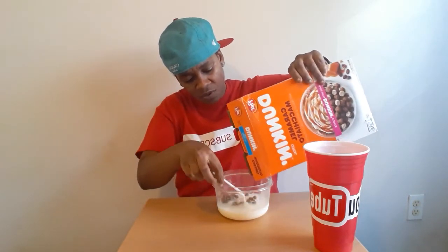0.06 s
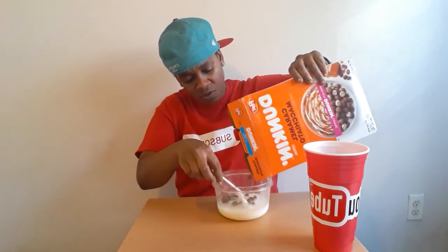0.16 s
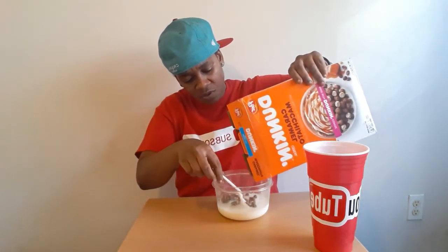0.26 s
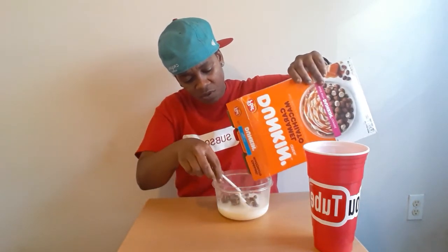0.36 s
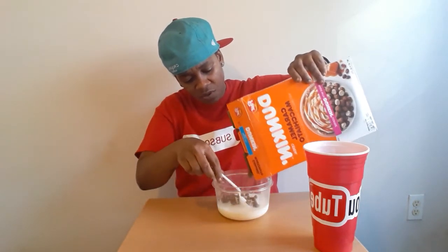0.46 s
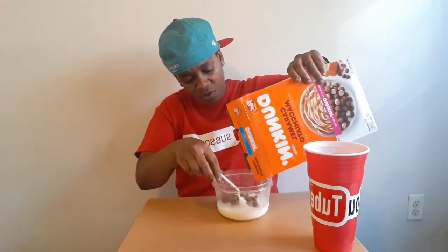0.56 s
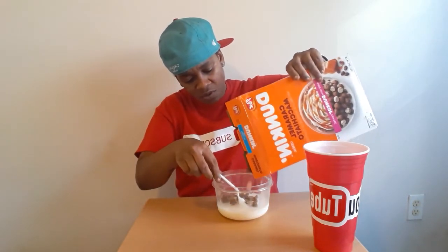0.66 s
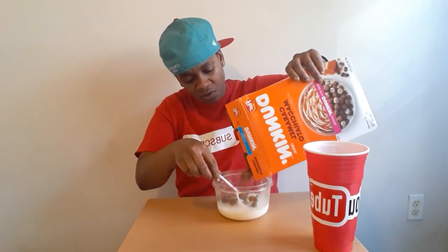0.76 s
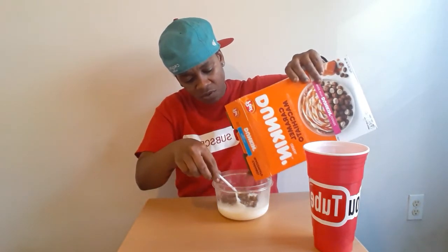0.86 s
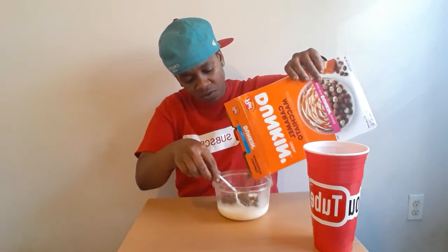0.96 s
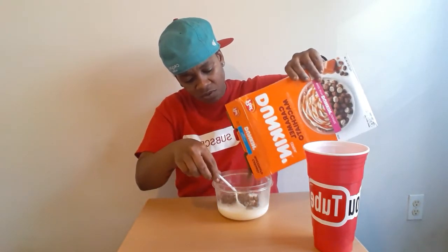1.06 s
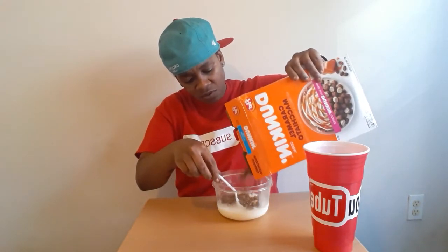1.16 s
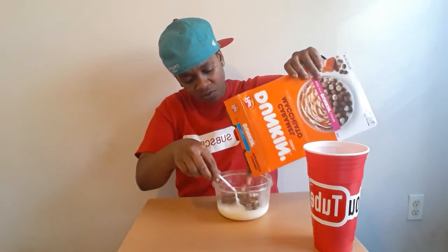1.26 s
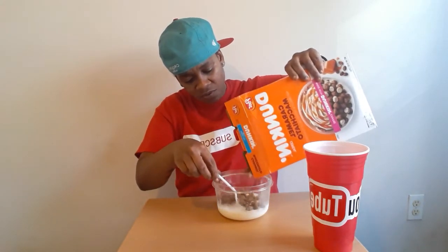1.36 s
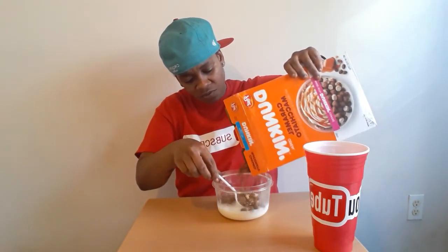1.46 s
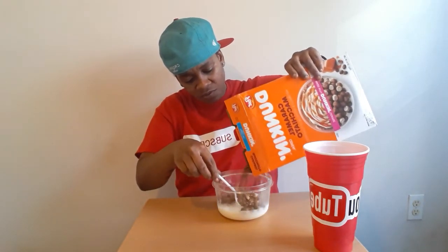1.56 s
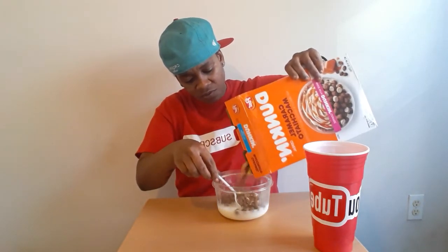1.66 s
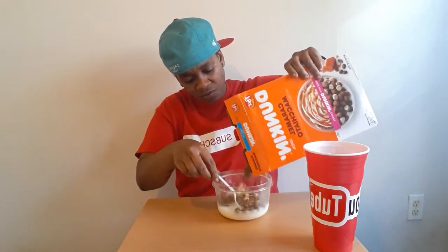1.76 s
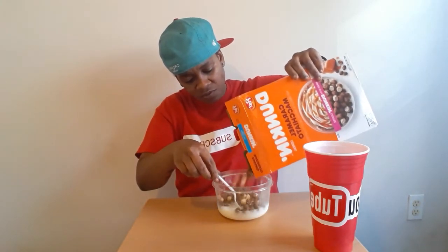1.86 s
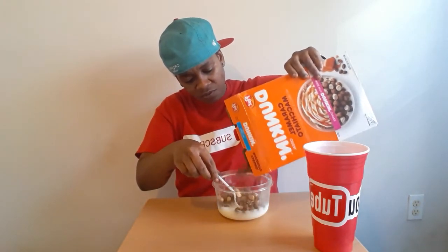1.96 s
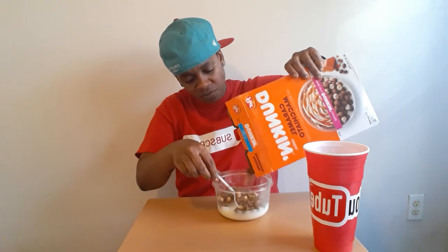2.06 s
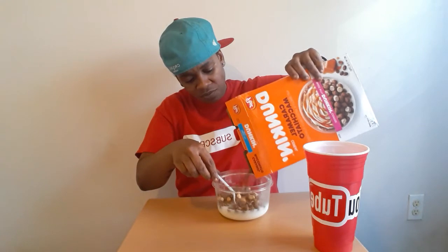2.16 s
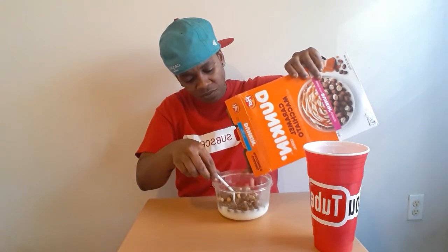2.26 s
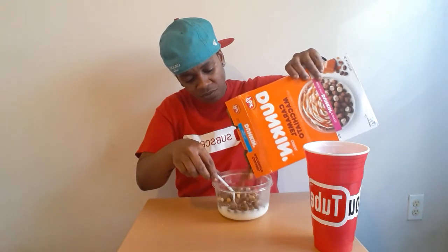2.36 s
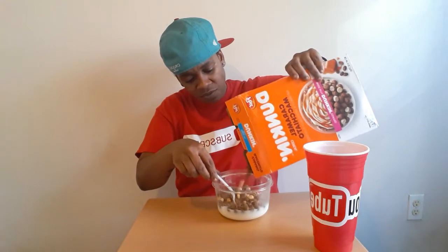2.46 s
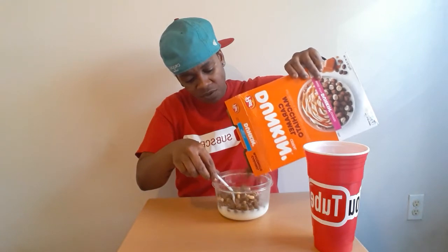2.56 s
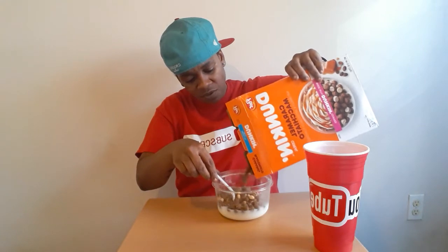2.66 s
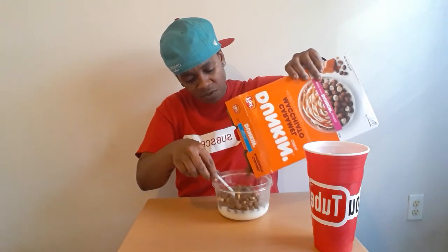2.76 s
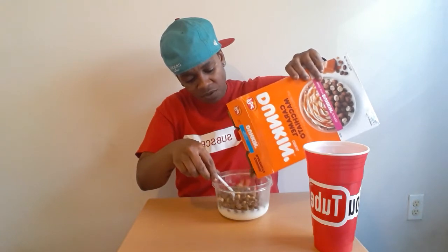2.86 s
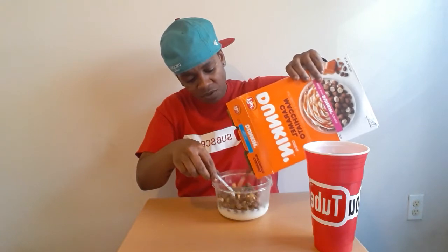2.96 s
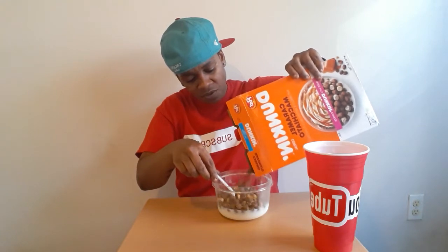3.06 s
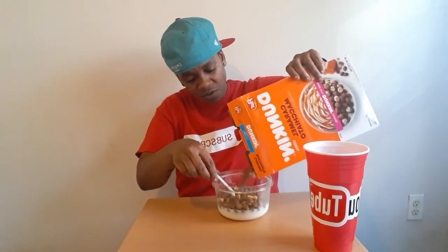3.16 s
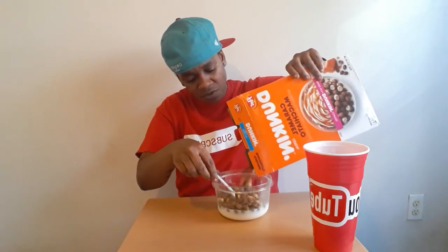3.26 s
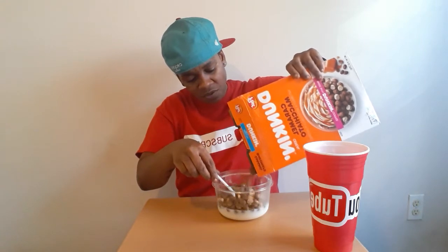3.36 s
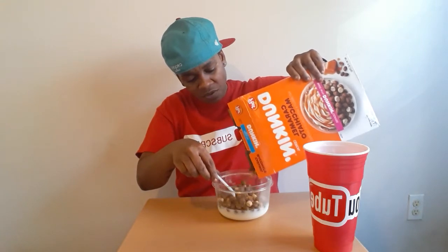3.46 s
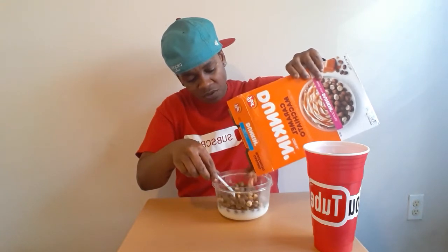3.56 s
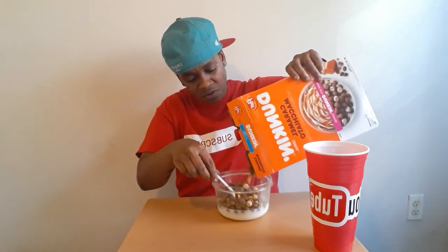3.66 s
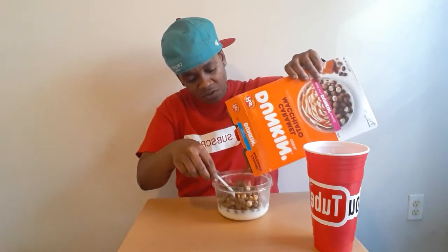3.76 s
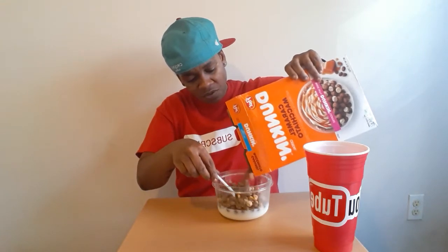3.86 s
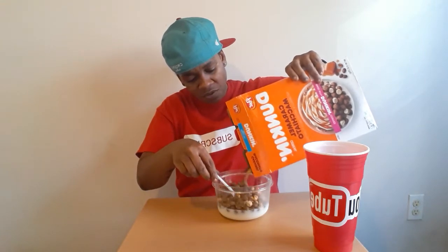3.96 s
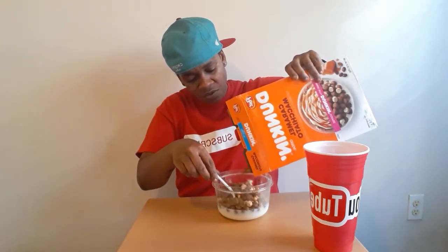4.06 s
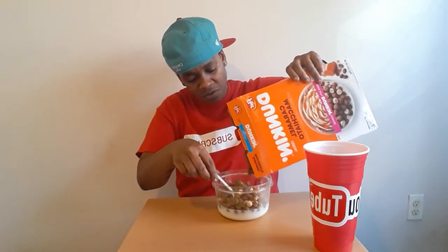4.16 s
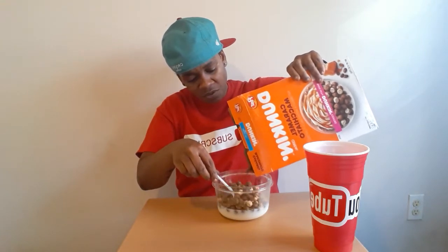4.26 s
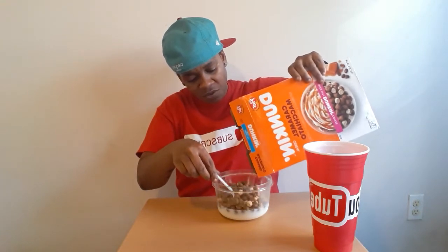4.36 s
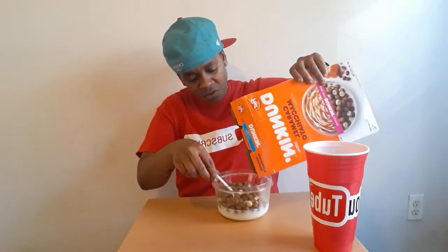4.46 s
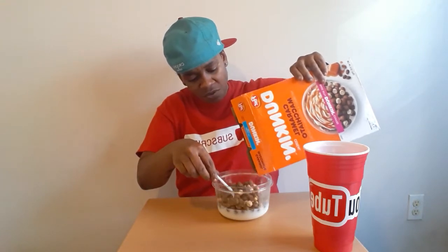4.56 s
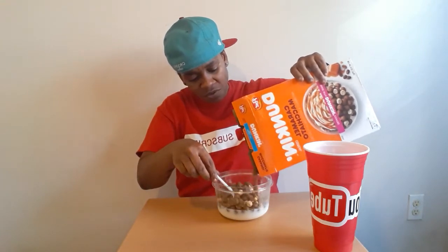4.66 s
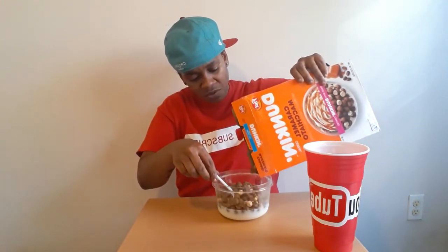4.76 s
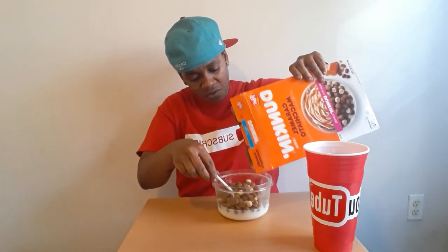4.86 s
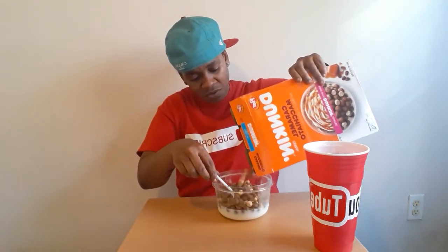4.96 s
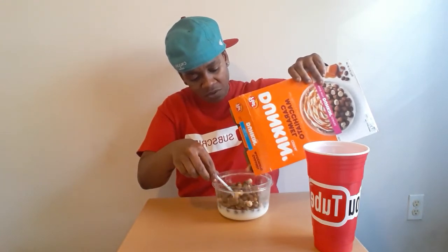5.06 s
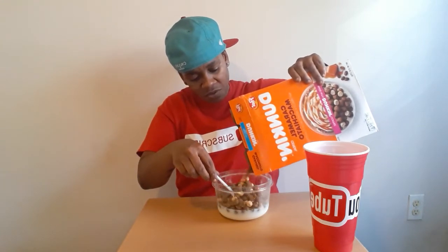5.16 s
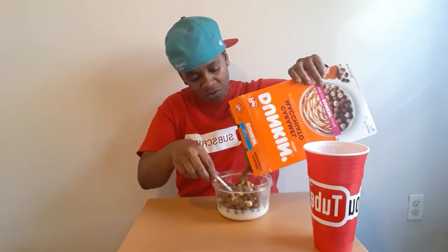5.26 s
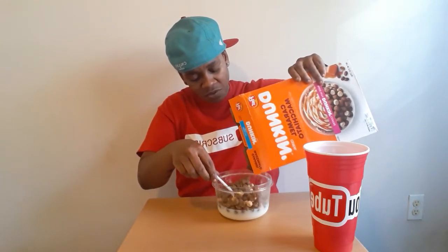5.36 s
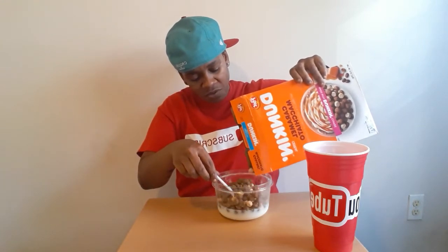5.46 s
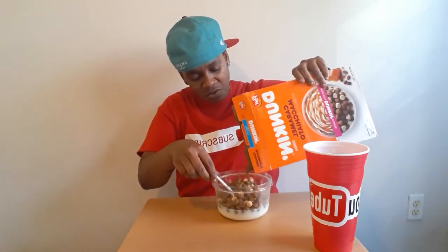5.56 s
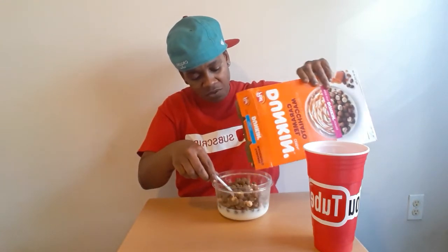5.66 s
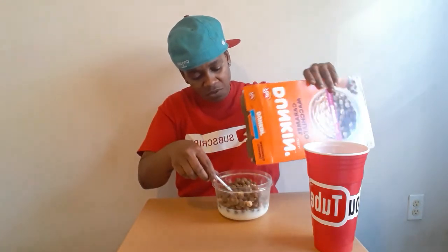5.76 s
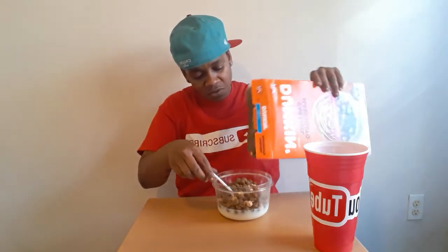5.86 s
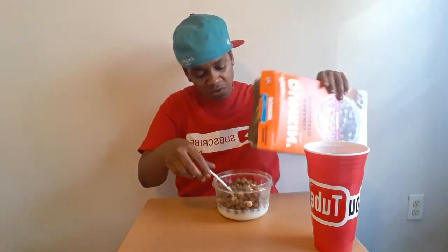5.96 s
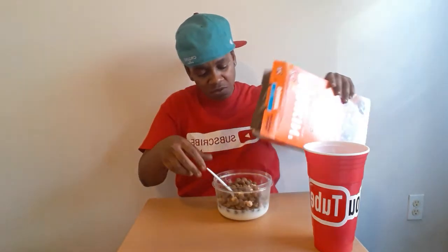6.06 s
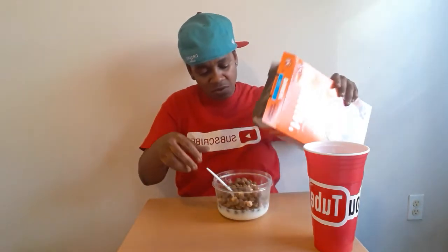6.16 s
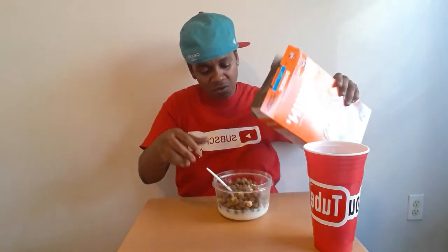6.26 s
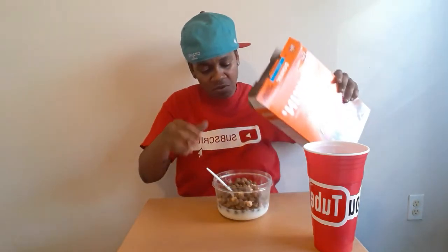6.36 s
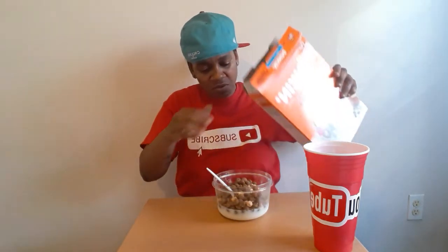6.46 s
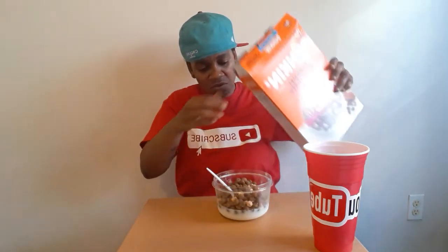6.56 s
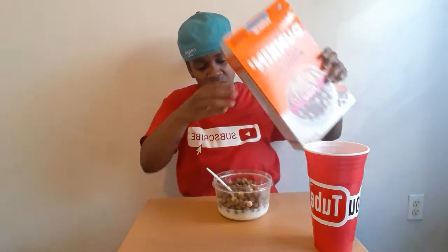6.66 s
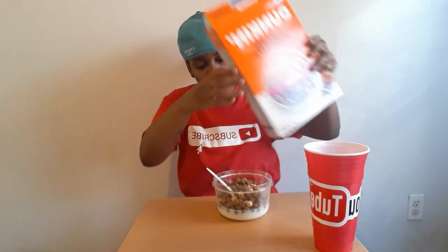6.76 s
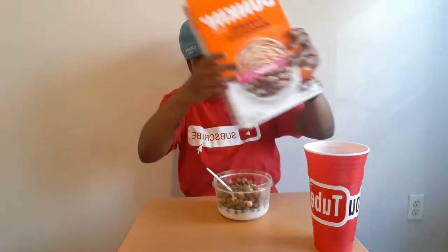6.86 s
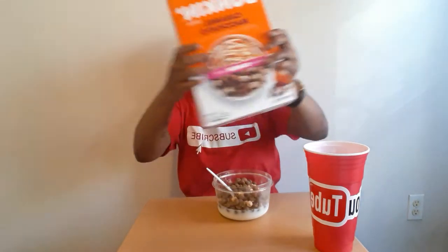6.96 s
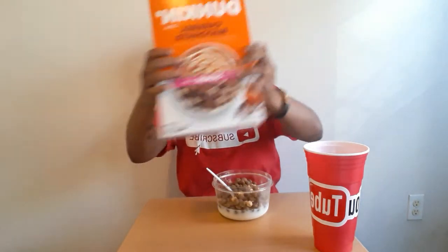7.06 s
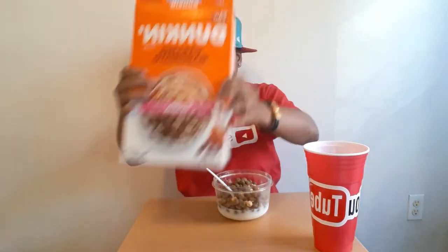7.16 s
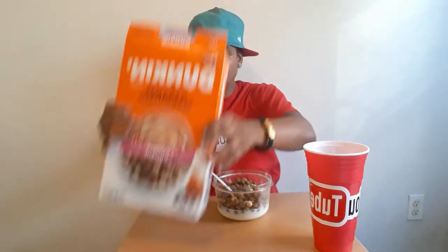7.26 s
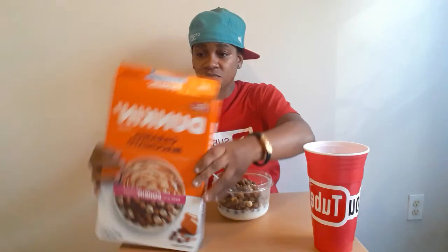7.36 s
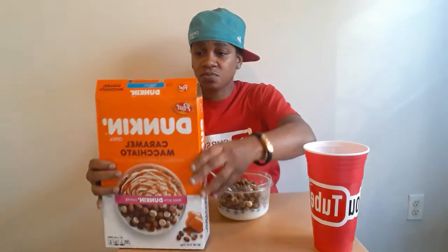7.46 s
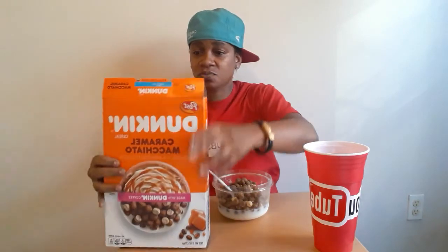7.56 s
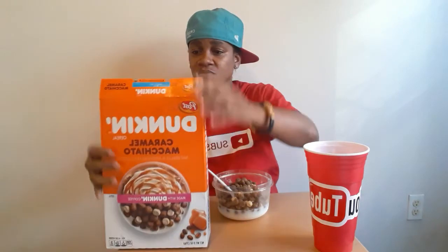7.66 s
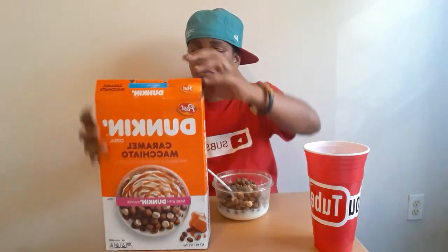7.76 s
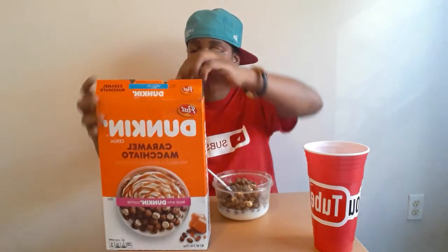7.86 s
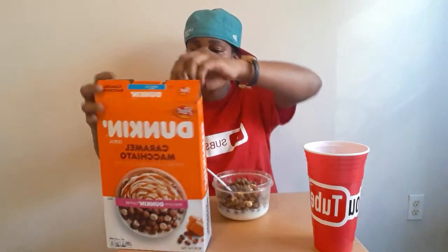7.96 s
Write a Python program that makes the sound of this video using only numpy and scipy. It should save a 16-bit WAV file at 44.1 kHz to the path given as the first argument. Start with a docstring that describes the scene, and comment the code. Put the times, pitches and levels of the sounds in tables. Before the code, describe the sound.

A close stereo microphone in a small bare room catches cereal shaken from a box: papery rustle, soft cardboard rumble, dry patter and crisp, high plastic ticks from the bowl, in irregular clusters. It thins out and nearly stops before six seconds. After a quiet moment of faint handling, the contents hiss and rattle to the bottom, the box thumps down, and a last small rustle ends it.

```python
"""Puffed cereal is shaken out of a cardboard box into a plastic bowl, in a bare room before a small stereo microphone.
Pieces rumble along the box wall, patter on each other and rustle in the liner bag: hails of tiny filtered contacts.
Short ticks ring the bowl wall with damped modes and bursts of noise; creases of the bag click.
Then the handled box rustles and scrapes, is righted, its load slides to the bottom and it lands, its panels ringing.
Echoes of decaying noise and a coloured hush lie around it all."""
import sys
import numpy as np
from scipy import signal
from scipy.fft import rfft, irfft, next_fast_len
from scipy.io import wavfile
from scipy.ndimage import map_coordinates

SR = 44100
rng = np.random.default_rng(int(sys.argv[2]) if len(sys.argv) > 2 else 0)


def generate_wav(sig):
    """Save sig (samples, or channels by samples) to the path in sys.argv[1] as 16-bit PCM at SR."""
    pcm = np.round(np.clip(np.atleast_2d(sig).T, -1, 1) * 32767).astype(np.int16)
    wavfile.write(sys.argv[1], SR, pcm)


N = 353241

# modes of the bowl wall: pitch_hz [Hz], level_db [dB, relative], t60_s [s, before damping]
BOWL_MODES = [(1950, -23, .01), (2330, -23, .008), (2740, -15, .011), (3340, -9, .011), (3650, -9, .008),
              (4080, -2, .010), (4370, 0, .010), (4750, -3, .007), (5430, -6, .008), (6000, -9, .007),
              (6500, -14, .005)]
# colour of loose pieces hitting each other or the box: pitch_hz [Hz], level_db [dB per Hz, relative]
PATTER_COLOUR = [(710, -32.5), (1200, 5.5), (1480, 2), (1870, 6), (2130, 2), (2280, 3.5), (4270, 6),
                 (6720, 1), (8000, -30), (10400, -38.5), (17600, -120)]
# colour of bag rustle and of dry snaps: pitch_hz [Hz], level_db [dB per Hz, relative]
RUSTLE_COLOUR = [(4350, -6.5), (7400, 3), (7980, -7), (10000, -5), (12100, 0), (12800, -0.5),
                 (15100, -10.5), (16200, -19.5)]


def amp(db):
    """Gain of a level in dB."""
    return 10 ** (np.asarray(db) / 20)


def unit(x):
    """x at rms 1."""
    return x / np.sqrt(np.mean(x ** 2) + 1e-20)


def along(points, hz):
    """Read a curve of (Hz, value) points on a log frequency axis."""
    point_hz, value = np.transpose(points)
    return np.interp(np.log(hz + 1), np.log(point_hz + 1), value)


def pulse(spectrum, size=2048):
    """The shortest causal (minimum-phase) pulse with this spectrum, energy 1."""
    gain = amp(along(spectrum, np.fft.rfftfreq(size, 1 / SR)))
    cepstrum = irfft(np.log(gain + 1e-6))
    # folding the cepstrum onto positive time makes the phase minimal
    cepstrum[1:size // 2] *= 2
    cepstrum[size // 2 + 1:] = 0
    shape = irfft(np.exp(rfft(cepstrum)))
    return shape / np.linalg.norm(shape)


def burst(colour, t60):
    """A short crackle of noise through this pulse, peak 1; the noise falls 60 dB in t60 seconds."""
    t = np.arange(int(SR * t60)) / SR
    noise = rng.standard_normal(SR // 8)[:len(t)]
    x = signal.fftconvolve(noise * amp(-60 * t / t60), colour)
    return x / np.abs(x).max()


def ring(modes, scatter_db, rise, damping=1, low_db=0, detune=0):
    """One blow, peak 1: modes vary in strength and pitch, and low_db sets the lowest three by where it lands."""
    t = np.arange(int(SR * max(m[2] for m in modes) / damping)) / SR
    hz, db, t60 = np.array(modes).T[:, :, None]
    db = db + scatter_db * rng.standard_normal(db.shape)
    db = db + low_db * (hz <= hz[2])
    hz = hz * (1 + detune * rng.standard_normal(hz.shape))
    swing = (-1) ** np.arange(len(modes))[:, None]  # neighbouring modes start in opposite directions
    decay = amp(db - 60 * t * damping / t60)
    x = np.sum(decay * swing * np.sin(2 * np.pi * hz * t), axis=0)
    x = x * (1 - np.exp(-t / rise))  # soft onset, rise in s
    return x / np.abs(x).max()


def add(track, s, sound):
    """Mix a sound in at time s."""
    part = track[..., max(round(s * SR), 0):][..., :sound.shape[-1]]
    part += sound[..., :part.shape[-1]]


def paired(two):
    """Two unrelated noises made as alike as a diffuse field is at two close ports."""
    # left-right likeness of diffuse sound: pitch_hz [Hz], likeness [correlation]
    likeness = [(30, 0.61), (100, 0.78), (400, 0.95), (800, 0.22), (1500, 0.089), (16000, 0.02)]
    alike = along(likeness, np.fft.rfftfreq(two.shape[1], 1 / SR))
    turn = np.arccos(np.clip(alike, -1, 1)) / 2
    mid, side = irfft(rfft(two) * [np.cos(turn), np.sin(turn)], two.shape[1])
    return np.array([mid + side, mid - side])


def grains(contact, per_second, spread_db, level_db, wide, clump_db):
    """A hail of tiny contacts of unequal size, in clumps, each from its own spot."""
    clumps = map_coordinates(rng.standard_normal(int(N * 40 / SR) + 4), [np.arange(N) * 40 / SR])
    hit_luck, size_luck, sign_luck, spot_luck = rng.random((4, N))
    sizes = amp(-spread_db * np.log(size_luck + 0.83)) * np.sign(sign_luck - .5)
    hail = (hit_luck < per_second / SR) * sizes * amp(clump_db * clumps)
    hail = hail / np.sqrt(per_second)  # a denser hail is no louder
    spot = wide * (2 * spot_luck - 1)  # pan angle in radians
    pair = hail * np.array([np.cos(spot) + np.sin(spot), np.cos(spot) - np.sin(spot)])
    heard = signal.fftconvolve(pair, contact[None], axes=1)[:, :N]
    return amp(level_db) * unit(heard)


def stream():
    """Pieces slide on cardboard, patter on each other and drag over the bag; while they pour, small ones tick the bowl."""
    # pieces sliding along the cardboard: time_s [s], level_db [dB]
    slide_levels = [(0.0, -58), (0.36, -56), (0.8, -53.5), (0.98, -51), (1.34, -53), (1.65, -50),
                    (1.94, -52.5), (2.23, -50.5), (2.43, -55), (2.77, -53.5), (3.23, -53), (3.48, -54),
                    (3.9, -52), (4.15, -56), (4.4, -56), (4.55, -58), (4.8, -57), (4.93, -57.5),
                    (5.02, -51), (5.11, -59.5), (5.2, -52.5), (5.26, -58), (5.32, -55), (5.45, -60),
                    (5.49, -53), (5.57, -62.5), (5.62, -68), (5.78, -77.5), (6.13, -96), (6.16, -75),
                    (6.33, -72.5), (6.57, -75), (6.66, -60.5), (6.74, -61), (6.79, -55), (6.85, -59),
                    (6.99, -54), (7.16, -46), (7.27, -42.5), (7.36, -38.5), (7.43, -37), (7.58, -52.5),
                    (7.65, -61), (7.775, -70), (7.79, -56.5), (7.95, -66.5), (8.01, -49)]
    # loose pieces pattering on each other: time_s [s], level_db [dB]
    patter_levels = [(0.0, -70), (0.75, -61.5), (0.9, -50), (1.45, -48.5), (1.6, -52), (1.76, -45),
                     (2.3, -50.5), (2.99, -52), (3.5, -50), (3.95, -54), (4.53, -59), (4.95, -59),
                     (5.2, -52.5), (5.5, -56.5), (5.6, -66), (5.9, -78.5), (6.6, -79), (6.63, -66),
                     (6.73, -63.5), (6.8, -58.5), (6.97, -62), (7.05, -52), (7.25, -47), (7.36, -46.5),
                     (7.389, -40.5), (7.6, -62.5), (7.76, -78), (8.01, -64.5)]
    # sudden bursts of patter and rustle: pieces spilling, later the box and bag rubbing as they are handled:
    # start_s [s], level_db [dB], drag_db [dB, drag on the bag over the patter]
    sudden_bursts = [(0.075, -48.5, -0.5), (0.232, -43, 2), (0.423, -50.5, 1), (0.588, -45.5, -3),
                     (0.781, -41.5, -5), (5.983, -61.5, -22), (6.152, -59, -6), (6.213, -69, 2),
                     (7.785, -76, -11), (7.99, -44, -3)]
    # colour of sliding on cardboard: pitch_hz [Hz], level_db [dB per Hz, relative]
    slide_colour = [(35, -32), (60, -22.5), (194, -7.5), (218, -10.5), (249, -4), (435, 0.5), (829, 0),
                    (975, -4.5), (1470, -15), (2000, -20), (2600, -26), (4400, -120)]
    pour_ends_s, burst_fade_db_per_s = 5.75, 130  # the box is tipped back as the pour ends
    bag_db, bag_follows = -52.5, 0.85  # rustle at a drag of -50 dB; dB of rustle per dB of drag

    t = np.arange(N) / SR
    pouring = t < pour_ends_s  # afterwards the whole load moves at once, denser and more even
    slide_db = np.interp(t, *np.transpose(slide_levels))
    steady_db = np.interp(t, *np.transpose(patter_levels))

    # sudden bursts join the steady patter as powers
    patter_power = amp(steady_db) ** 2
    drag_power = amp(steady_db) ** 2
    for start_s, level_db, drag_db in sudden_bursts:
        fading_db = level_db - burst_fade_db_per_s * np.abs(t - start_s)
        burst_power = amp(fading_db) ** 2 * (t >= start_s)
        patter_power = patter_power + burst_power
        drag_power = drag_power + burst_power * amp(drag_db) ** 2
    patter_db = 10 * np.log10(patter_power)
    rustle_db = bag_db + bag_follows * (10 * np.log10(drag_power) + 50)

    slide = grains(pulse(slide_colour), 1000, 2.5, slide_db, wide=.15, clump_db=1.2)
    patter = grains(pulse(PATTER_COLOUR), np.where(pouring, 400, 1500), 5, patter_db,
                    wide=.9, clump_db=np.where(pouring, 2.2, 1.3))
    rustle = grains(pulse(RUSTLE_COLOUR), 2000, 4.5, rustle_db, wide=1.4, clump_db=1.5)
    small_tick = ring(BOWL_MODES, scatter_db=0, rise=.0003, damping=1.5)
    small = grains(small_tick, 70, 5, patter_db, wide=.3, clump_db=3)
    return slide + patter + rustle + amp(-12) * small * pouring


def ticks():
    """Each tick is a brief ring of the thin bowl wall's modes, a crunch and a dry snap in the treble."""
    # short ticks: pieces striking the bowl or heap, the last faint ones rustles and scrapes as the box is handled:
    # start_s [s], ring_db [dB, peak of the ring], crunch_db [dB over the ring],
    # low_db [dB on the lowest modes, by where it lands]
    short_ticks = [(0.0765, -26.5, 8.5, 4), (0.233, -30, -15, 0), (0.2477, -47, 22, 2),
                   (0.312, -43.5, 16, 13), (0.4198, -52.5, 20.5, -4), (0.4491, -34, 7, 9),
                   (0.522, -38.5, -18, 9), (0.5881, -35, -24, -4), (0.778, -34, 3, -5), (0.821, -33, 3, -7),
                   (0.93, -33.5, -11, 6), (1.082, -41, -12, 16), (1.107, -30.5, 11, 17),
                   (1.1575, -33.5, 4.5, 3), (1.2386, -52, 0, 2), (1.255, -45, -1, -1),
                   (1.2906, -32.5, -3, 3), (1.478, -40, -6, 13), (1.5655, -9.5, -15, 4),
                   (1.591, -16, -3, 12), (1.5948, -19, -18.5, 14), (1.7027, -29, 1, 18),
                   (1.766, -18.5, 0.5, 7.5), (1.834, -17.5, -2, 4.5), (1.942, -26.5, 9.5, 22),
                   (2.041, -50, -8, 6), (2.0582, -41, -9, 15), (2.079, -26, -6, 17), (2.123, -21, -17, 1),
                   (2.14, -16.5, -9, 9), (2.1793, -19, -6, 2), (2.2756, -25, -8, 13),
                   (2.308, -18.5, -16, 6), (2.3448, -22.5, -17, 9), (2.399, -26, -9.5, 3),
                   (2.5092, -10.5, -3.5, 0), (2.5845, -38.5, 7, 6), (2.6847, -27.5, -10, 11),
                   (2.779, -34, -7, 12), (2.7978, -30, -11, 16), (2.827, -23, -21, 10),
                   (2.838, -32, -10.5, 8), (2.859, -23.5, -32, 10), (2.879, -25.5, -25, 13),
                   (2.992, -42, -11, 6), (3.0765, -28.5, 5, 4), (3.1852, -36.5, 7, 17),
                   (3.2526, -26.5, -0.5, 4), (3.27, -19.5, -26, 5), (3.3679, -19, -23, 0),
                   (3.402, -27.5, -3, 8), (3.4194, -25, -18, 5), (3.438, -32, -5, 9), (3.525, -35, -6, -3),
                   (3.5593, -26, -13, 8), (3.5747, -21, -0.5, -9), (3.6173, -26, -21, 7),
                   (3.753, -35, -2, 4), (3.77, -32, 21, -3), (3.858, -24.5, -32, 5.5), (3.926, -35.5, 3, 0),
                   (4.009, -31, -4, 0), (4.0648, -37, -4, 9), (4.181, -35, -17, 14), (4.2103, -34, -11, 5),
                   (4.263, -44.5, 10.5, 11), (4.289, -28.5, -15.5, -12), (4.356, -28.5, -28, 4),
                   (4.6199, -37, 1.5, -11), (4.7087, -35, -3, 12), (4.8283, -41, -14, 2),
                   (4.8502, -35.5, -17, 10), (5.019, -40.5, 7, 16), (5.0404, -46, 10, 5),
                   (5.0662, -25.5, -8, 4), (5.1091, -18, 4, 3), (5.173, -28, -5, 10), (5.2405, -47, -5, 3),
                   (5.261, -26, -7, 6), (5.4062, -25.5, 0, -1), (5.46, -40, -10, -8), (5.596, -42, -9, -13),
                   (5.648, -50, 7, 0), (5.67, -20, 1, 3), (5.8064, -37, -16, -1), (5.859, -47.5, -14, 0),
                   (5.914, -47, -16, 11), (5.9834, -44.5, 2, 11), (6.019, -42.5, -8, 10),
                   (6.077, -48, 2, 15), (6.1513, -49, -2, -4), (6.215, -47.5, -11, -1)]
    # colour of the crunch: pitch_hz [Hz], level_db [dB, relative]
    crunch_colour = [(1200, -50), (2000, -26), (3000, -12), (4600, 0), (6000, -1), (7000, -12), (8000, -35)]
    snap_base_db, snap_follows = -38.5, 0.92  # snap of a -25 dB ring; dB of snap per dB of ring
    out, crunch, snap = np.zeros(N), pulse(crunch_colour), pulse(RUSTLE_COLOUR)
    for start_s, ring_db, crunch_db, low_db in short_ticks:
        wall = ring(BOWL_MODES, scatter_db=2, rise=0.001, damping=1.3, low_db=low_db, detune=.012)
        snap_db = snap_base_db + snap_follows * (ring_db + 25)
        add(out, start_s, amp(ring_db) * wall)
        add(out, start_s, amp(ring_db + crunch_db) * burst(crunch, t60=0.0026))
        add(out, start_s, amp(snap_db) * burst(snap, t60=.012))
    return out


def creases():
    """Each crease of the liner bag snaps with one bright click of filtered noise."""
    # creases snapping: start_s [s], peak_db [dB]
    snaps = [(0.2321, -24.5), (0.7868, -29), (0.821, -41), (0.853, -25.5), (1.027, -44), (1.1088, -29),
             (1.318, -28.5), (1.3873, -28), (1.8464, -33), (1.9416, -29), (2.0826, -27.5), (2.648, -38),
             (2.756, -33.5), (2.877, -31.5), (2.9224, -30.5), (2.9544, -32), (4.1807, -35), (4.3681, -31),
             (4.4133, -31), (5.243, -40), (5.306, -40), (5.48, -35), (5.705, -31.5), (6.2136, -46),
             (7.817, -44), (7.977, -40)]
    # colour of the click: pitch_hz [Hz], level_db [dB, relative]
    click_colour = [(1500, -35), (3500, -9), (6800, 0), (7800, -12), (10000, -9), (12500, -3), (16000, -16)]
    out, click = np.zeros(N), pulse(click_colour)
    for start_s, peak_db in snaps:
        add(out, start_s, amp(peak_db) * burst(click, t60=0.0083))
    return out


def knocks():
    """Soft blows ring the box panels while the load slaps the wall."""
    # knocks on the cardboard, the hardest as the box lands: start_s [s],
    # strength_db [dB, reference for panel and slap], low_db [dB on the lowest modes, by where it lands]
    blows = [(0.182, -49.5, -19), (0.455, -42.5, -18), (1.298, -41.5, -6.5), (1.458, -44, -15),
             (1.663, -43, 7.5), (2.01, -42.5, -15), (2.053, -40, -21), (2.163, -34, -23), (2.185, -43, -26),
             (3.037, -42, -22), (3.253, -40, -3), (3.356, -44, -12), (3.559, -44, -9), (3.922, -50, -14),
             (4.366, -42, -13), (4.839, -41.5, -4), (5.012, -47, -5), (5.318, -46, -14),
             (6.918, -44.5, 1.5), (6.956, -44.5, -10), (7.008, -46, -10), (7.04, -50, 2),
             (7.087, -39.5, 12), (7.367, -25.5, 4), (7.379, -20.5, -21), (7.413, -32, 7),
             (7.991, -41.5, -1)]
    # modes of the box panels: pitch_hz [Hz], level_db [dB, relative], t60_s [s, before damping]
    panel_modes = [(89, -10.5, 0.12), (148, -3.5, 0.11), (205, -1, 0.13), (284, -2.5, 0.13),
                   (351, -3, 0.148), (430, 0.5, 0.16), (552, 1, 0.12), (703, 0.5, 0.073), (803, 3, 0.091),
                   (866, -0.5, 0.16), (1072, -2.5, 0.088), (1290, -3, .06)]
    panel_db, slap_db = 2.5, -2.5  # peaks over the strength of the knock
    out, slap = np.zeros(N), pulse(PATTER_COLOUR)
    for start_s, strength_db, low_db in blows:
        panel = ring(panel_modes, scatter_db=2, rise=.0011, damping=2.8, low_db=low_db)
        add(out, start_s, amp(strength_db + panel_db) * panel)
        add(out, start_s, amp(strength_db + slap_db) * burst(slap, t60=0.051))
    return out


def room(x, size=SR // 7):
    """The walls answer each moment a little differently, as the sources move; early echoes arrive in lumps."""
    # decay of the echoes: pitch_hz [Hz], t60_s [s]
    wall_decay = [(200, 0.29), (1000, 0.24), (3000, 0.47), (7000, 0.22), (14000, 0.33)]
    table_db = 6  # the first echoes, off table and box, over the later ones
    out, t_tail = np.zeros((2, N)), np.arange(2 ** 14) / SR
    for start in range(0, N, size):
        lumps = map_coordinates(rng.standard_normal(200), [t_tail * 450])
        early_db = (1.96 * lumps + table_db) * np.exp(-t_tail / 0.011)
        echoes = rng.standard_normal((2, len(t_tail))) * amp(early_db)
        # each band decays at its own rate
        hz, t, bands = signal.stft(echoes, SR, nperseg=256)
        decay = amp(-60 * t / along(wall_decay, hz)[:, None])
        tail = paired(signal.istft(bands * decay, SR, nperseg=256)[1])
        tail = tail / np.sqrt(np.sum(tail ** 2) / 2)
        wet = signal.fftconvolve(x[None, start:start + size], tail, axes=1)
        add(out, start / SR + .002, wet)
    return out


def hush():
    """The still room and the microphone's own hiss: steady noise through one colour."""
    # colour of the hush: pitch_hz [Hz], level_db [dB per Hz, relative]
    hush_colour = [(15, -45.5), (25, 4), (134, 4.5), (224, -5.5), (279, -2), (500, -19), (900, -8),
                   (1400, -26), (2500, -23.5), (5200, -15.5), (6630, -4.5), (8010, -42), (12700, -6.5),
                   (16200, -25)]
    size = next_fast_len(N)
    colour = amp(along(hush_colour, np.fft.rfftfreq(size, 1 / SR)))
    noise = paired(rng.standard_normal((2, size)))
    return amp(-64.5) * unit(irfft(rfft(noise) * colour, size)[:, :N])


def scene():
    """Direct sound, its echoes and the hush."""
    pour, bowl, blows = stream(), ticks(), creases() + knocks()
    pour_mono = pour.sum(axis=0) / 2
    echoes = room(amp(3.0) * bowl + amp(1.5) * blows + amp(-0.5) * pour_mono)
    return pour + bowl + blows + echoes + hush()


def record(dry):
    """The ports differ a little in gain and arrival; deep bass and all above the band limit are lost."""
    # gain difference of the ports: pitch_hz [Hz], difference_db [dB, left minus right]
    port_gains = [(30, -0.5), (500, -2), (4000, -2), (8000, 2), (16000, -0.5)]
    top_hz, bass_hz, right_lag_s = 16200, 70, .000014
    size = next_fast_len(N + SR // 4)
    hz = np.fft.rfftfreq(size, 1 / SR)
    sides = amp(along(port_gains, hz) / 2 * np.array([[1], [-1]]))
    lag = np.exp(-2j * np.pi * hz * np.array([[0], [right_lag_s]]))
    bass_cut = (1j * hz / (1j * hz + bass_hz)) ** 3
    return irfft(rfft(dry, size) * sides * lag * bass_cut * (hz < top_hz), size)[:, :N]


dry = scene()
out = record(dry)
generate_wav(out)
```